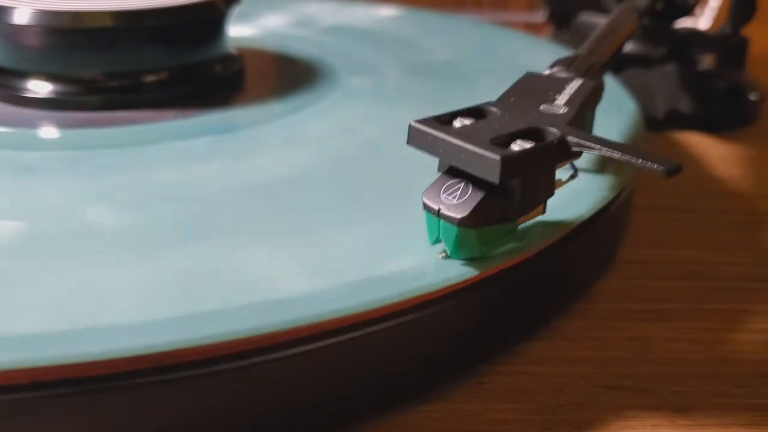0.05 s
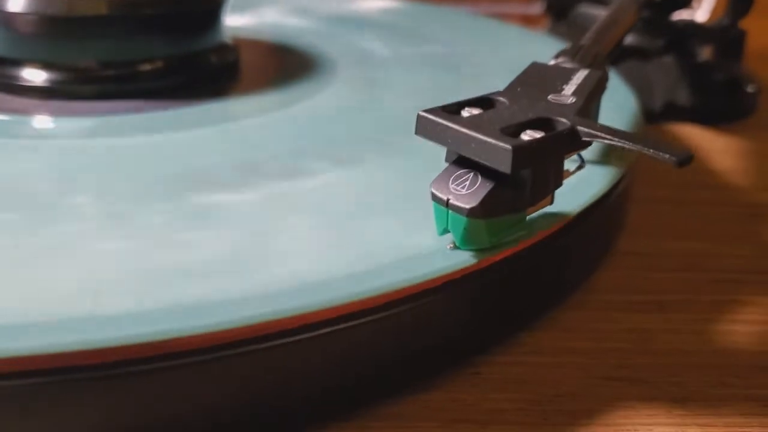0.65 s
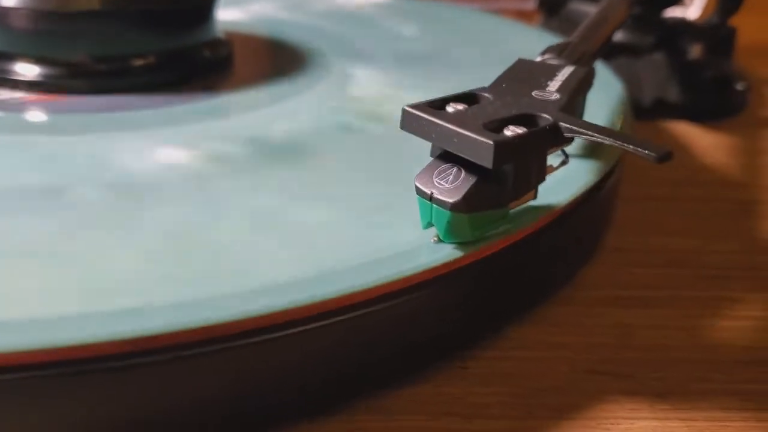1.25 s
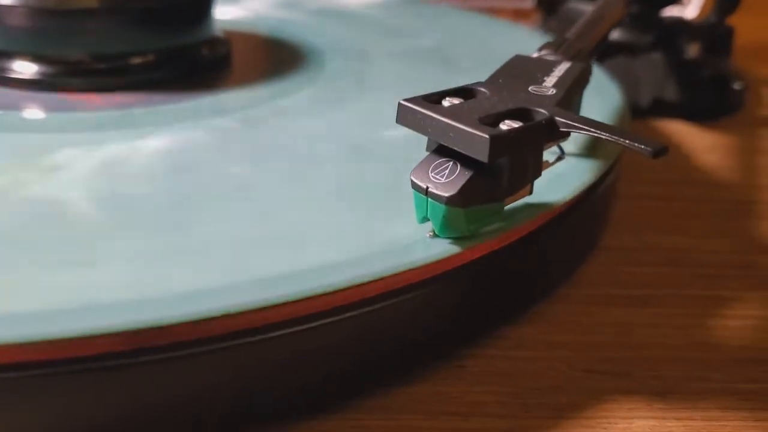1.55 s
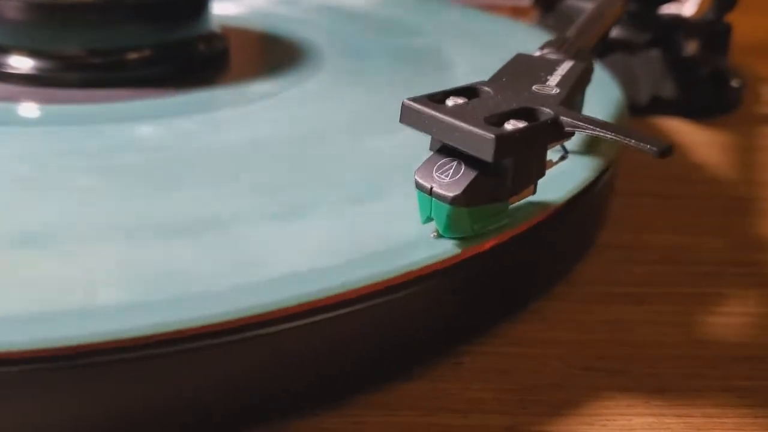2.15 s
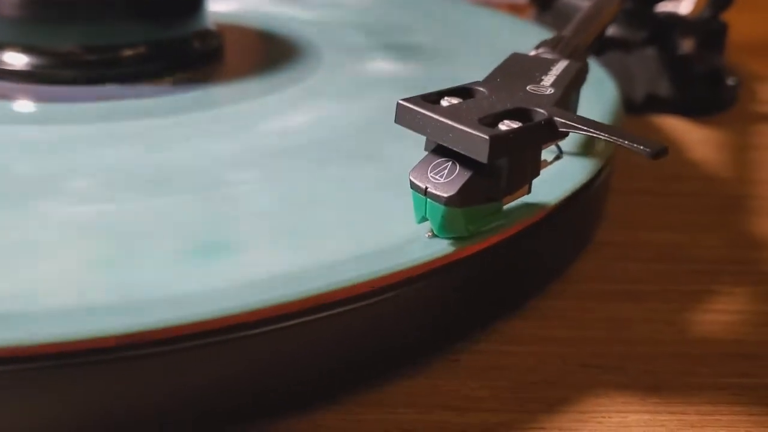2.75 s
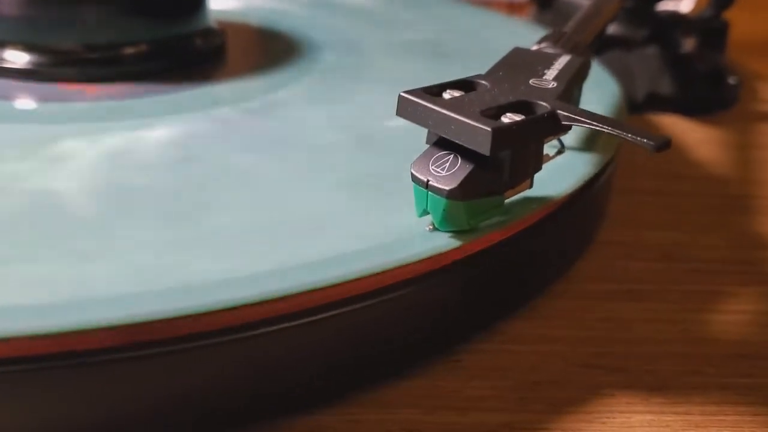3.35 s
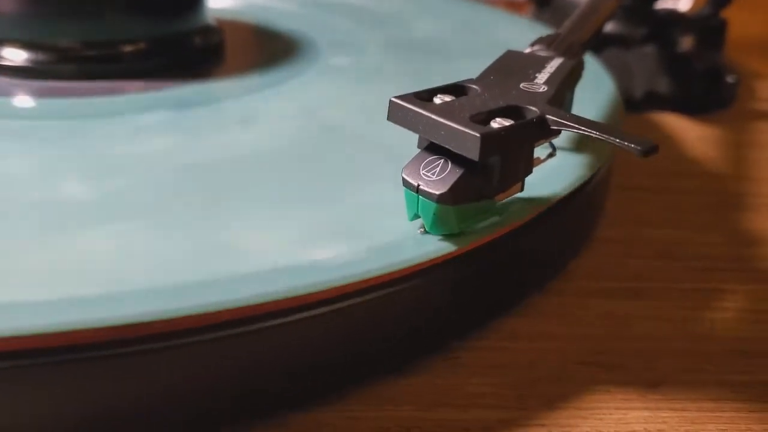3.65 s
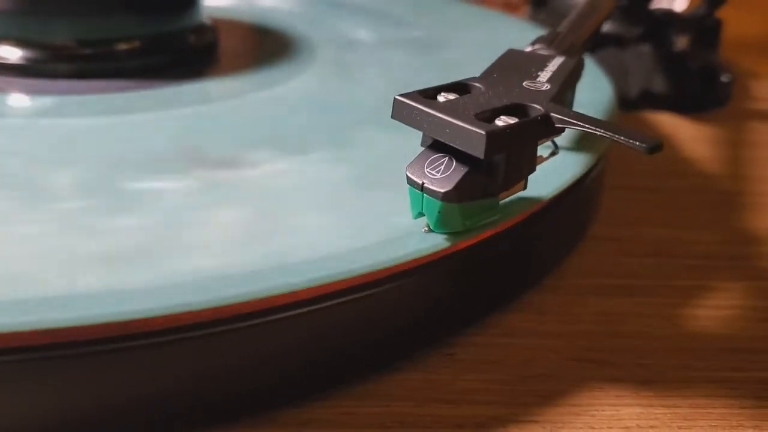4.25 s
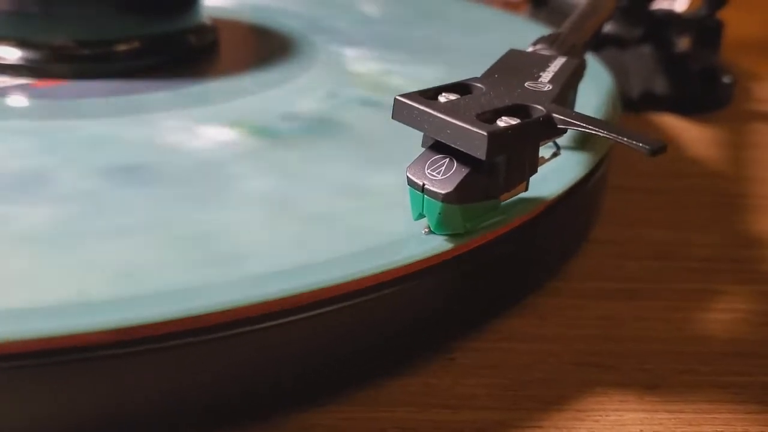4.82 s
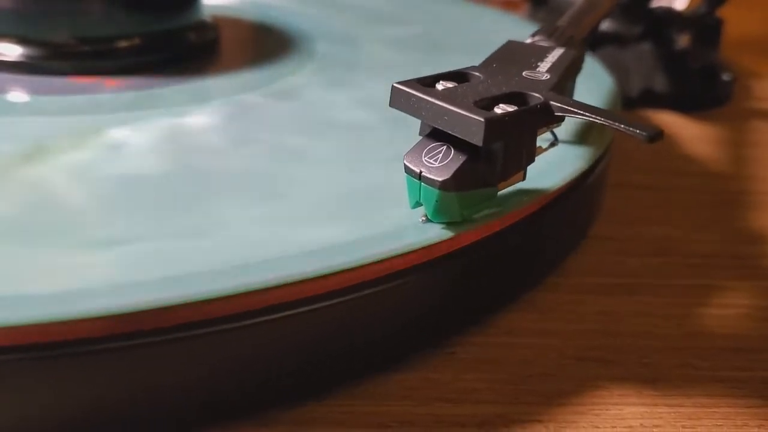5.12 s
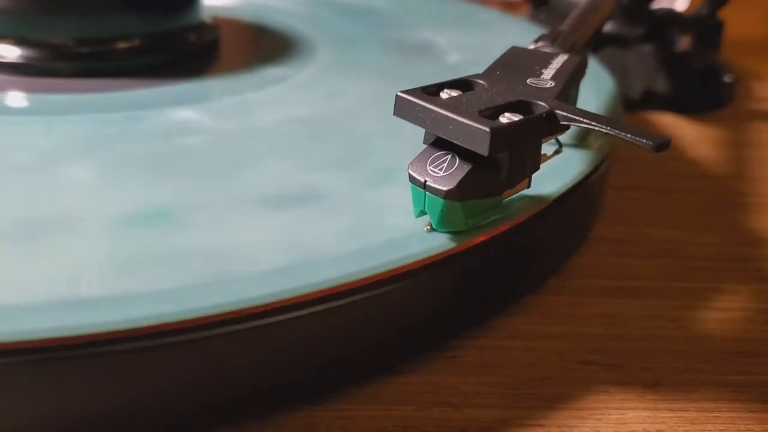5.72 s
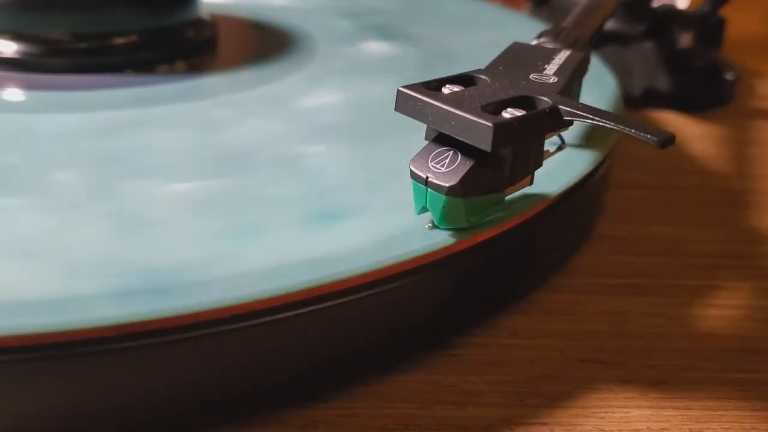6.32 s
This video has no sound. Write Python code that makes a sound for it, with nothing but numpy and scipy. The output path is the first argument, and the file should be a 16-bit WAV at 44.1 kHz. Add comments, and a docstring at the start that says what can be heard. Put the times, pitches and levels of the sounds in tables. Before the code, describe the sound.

A record stylus pops and thumps once per turn, with fine ticks between, over faint hiss, low rumble and motor hum.

```python
"""A small room, heard from a phone beside a record deck: a stylus rides the unmodulated edge groove at
33 rpm and plays through a loudspeaker. Once a turn a deep nick kicks it into a pop and a bass thump,
then a few fine scratches tick; warps bump softly in between. Under it all, grains of the groove wall
crackle and hiss, the bearing rumbles and the motor hums."""
import sys
import numpy as np
from scipy import signal
from scipy.fft import rfft, irfft, next_fast_len
from scipy.io import wavfile
from scipy.ndimage import uniform_filter1d

SR = 44100
rng = np.random.default_rng(int(sys.argv[2]) if len(sys.argv) > 2 else 0)


def transcribe(signal):
    """Save signal, clipped to [-1, 1], as a 16-bit WAV file at the path in sys.argv[1]."""
    frames = np.atleast_2d(signal).T
    limited = np.clip(frames, -1, 1)
    pcm = np.round(limited * 32767).astype(np.int16)
    wavfile.write(sys.argv[1], SR, pcm)


N = 290178
TURN_S = 1.8008
TIME = np.arange(N) / SR
FFT_SIZE = next_fast_len(N + SR)
FREQ = np.maximum(np.arange(FFT_SIZE // 2 + 1) * SR / FFT_SIZE, 1)

# The deep nick, once a turn. Each row: start in seconds, level in dB.
NICK_HITS = [(0.4310, -0.5), (2.2356, -0.4), (4.0171, -2), (5.8286, -0.5)]
# The pop's tone, dull because the nick is wide. Each row: frequency in Hz, gain in dB.
POP_EQ = [(100, 3), (230, 9.5), (380, 4.5), (620, 12), (800, -2), (1100, -1), (1700, -8.5), (2100, -12.5),
          (3100, -12.5), (5700, -18.5), (7300, -29.5), (9000, -37), (15000, -33)]
# Tonearm and record ringing after a kick. Each row: pitch in Hz, level in dB, t60 in seconds.
ARM_MODES = [(353.5, -39, 0.096), (415, -49, 0.053), (470, -49, 0.17), (580, -66, 0.043),
             (672, -58.5, 0.093), (986, -52.5, 0.21), (990, -51, .06), (1206, -82, 0.26),
             (1410, -67, 0.063), (1954, -55, 0.096), (2010, -63, .09), (2216, -69, .1), (2370, -65, 0.13)]
# The boom of loudspeaker and room.
# Each row: pitch in Hz, level in dB, t60 in seconds, polarity at the listener.
BASS_MODES = [(55.9, -28, 0.29, -1), (71.2, -16, 0.19, 1), (80.15, -23, 0.29, -1), (95.44, -11.5, 0.19, -1),
              (96.2, -20.5, 0.31, 1), (105.8, -24, 0.16, 1), (157, -26, 0.052, 1)]
# Fine scratches and dust. Each row: seconds into the turn, level in dB, treble tilt in dB per octave,
# left minus right groove wall in dB, low cut in Hz.
SCRATCHES = [(0.0471, -42, -7, 3, 7000), (0.5117, -21.5, -10.5, 0, 2200), (0.5303, -19.5, -2, -5.5, 1500),
             (0.5511, -35, -2, -3, 3000), (0.5965, -35.5, 9, -6.5, 7000), (1.4734, -37, -15, 4, 6000),
             (1.5139, -33.5, -1.5, -2, 7000)]
# Warps and dimples that lift the stylus.
# Each row: crest in seconds into the turn, peak in dB, length in seconds.
WARPS = [(0.222, -43.5, 0.12), (0.726, -46.5, 0.07), (1.202, -45.5, 0.098), (1.675, -49, 0.081)]
# Scuffed patches. Each row: seconds into the turn, level in dB, decay time in seconds, centre in Hz.
SCUFFS = [(0.073, -65.5, 0.017, 5800), (1.166, -69, 0.051, 5500), (1.474, -67.5, 0.066, 5970)]
# Short crackly scuffs that do not sound on every turn.
# Each row: start in seconds, level in dB, decay time in seconds, centre in Hz.
OCCASIONAL_SCUFFS = [(0.379, -58, 0.012, 5500), (2.529, -55, 0.031, 2820), (3.862, -66.5, 0.027, 5600),
                     (3.977, -65, 0.013, 5580), (5.761, -57.5, 0.0065, 4420), (5.781, -57, 0.009, 4400),
                     (5.804, -58.5, .007, 4400)]
# Direct sound from the loudspeaker into each microphone port. Each row: frequency in Hz, gain in dB.
LEFT_PORT_EQ = [(1100, 1), (1750, -0.5), (2050, 10.5), (3100, -2), (4300, -14), (5100, 5.5), (5750, 13.5),
                (6450, 8), (7200, -22), (8300, -24), (9500, 1.5), (11200, -0.5), (12800, -13.5),
                (15500, -22.5)]
RIGHT_PORT_EQ = [(600, 1), (1200, -10.5), (1700, -12), (2100, -9), (3100, -2), (5100, -8), (5900, -13.5),
                 (7800, -13), (9000, -6.5), (10800, -24), (12100, -1.5), (14000, -13.5), (16000, -10)]
# The colour of the room's reflections. Each row: frequency in Hz, left gain in dB, right gain in dB.
REVERB_EQ = [(120, -5.5, -17), (330, -6, -7), (638, -9.5, -12), (1090, -17, -12.5), (1574, -5, -15.5),
             (1940, -1.5, -10.5), (3030, -4.5, -13), (4360, -7, -14.5), (5530, -1.5, -7.5),
             (6710, 3.5, -23), (7500, -19.5, -11.5), (9220, 2, -11), (12000, -23, -5), (15500, -18, -21)]
# The bed of rumble and room air. Each row: frequency in Hz, left gain in dB, right gain in dB.
RUMBLE_EQ = [(24.5, -64, -56.5), (46.4, -42, -39.5), (60.6, -34, -32.5), (111.8, -36.5, -36),
             (154, -46.5, -44.5), (198, -39.5, -44), (265, -51.5, -52), (537, -52.5, -59),
             (553, -49.5, -57.5), (1377, -59, -63.5), (1515, -61.5, -72.5), (2810, -75, -77),
             (7600, -88.5, -96), (15200, -80.5, -88)]
# The motor's tones. Each row: pitch in Hz, level in dB, start of a one-second fade-in in seconds.
MOTOR_TONES = [(184, -64.5, -1), (323, -81, -1), (574, -82.5, -1.8), (824, -89, -1), (1318, -86, 1.5)]


def nick_kicks():
    """One sharp kick of the stylus each time the nick comes round."""
    kicks = np.zeros(N)
    for start, db in NICK_HITS:
        add(kicks, start, undb([db]))
    return kicks


def pop(kicks, low_cut_hz=70, scrape_db=-54, scrape_after_s=0.018, scrape_width_s=0.021):
    """The kick cracks, the arm rings, and the stylus scrapes as it settles back on the groove walls."""
    crack = eq_curve(POP_EQ) * 1j * FREQ / (1j * FREQ + low_cut_hz)
    settling = sum(undb(db) * np.exp(-((TIME - start - scrape_after_s) / scrape_width_s) ** 2)
                   for start, db in NICK_HITS)
    scrape_eq = eq_curve([(500, -10.5), (4200, 3), (5800, -22), (9000, -12.5)])
    scrape = filtered(settling * rng.standard_normal(N), scrape_eq)
    return filtered(kicks, crack + ringing(ARM_MODES)) + undb(scrape_db) * scrape


def thump(kicks):
    """The kick rings the bass modes, which beat as they die, a little right of centre."""
    return filtered(kicks, ringing(BASS_MODES)) * pan(left_db=-1.95)


def ticks(tilt_above_hz=5700, size=256):
    """Fine scratches: very short pulses without bass, unequal on the two groove walls."""
    out = np.zeros((2, N))
    hz = np.maximum(np.arange(size // 2 + 1) * SR / size, 1)
    octaves_up = np.log2(np.maximum(hz / tilt_above_hz, 1))
    for at, db, tilt_db, wall_db, low_cut_hz in every_turn(SCRATCHES):
        spectrum = undb(db + tilt_db * octaves_up) * hz / np.hypot(hz, low_cut_hz)
        pulse = np.roll(irfft(spectrum), size // 2)
        add(out, at - size / 2 / SR, pulse * pan(wall_db))
    return out


def warps(bass_hz=77, wander=0.1, bounce_after_s=0.143, bounce_db=-43.5, bounce_length_s=0.046):
    """Warps and the arm's bounce after a pop rock the stylus; only the speaker's bass resonance sounds."""
    swell = np.zeros(N)
    bounces = [(start + bounce_after_s, db + bounce_db, bounce_length_s) for start, db in NICK_HITS]
    for crest, db, length in every_turn(WARPS) + bounces:
        add(swell, crest - length / 2, undb(db) * np.hanning(int(length * SR)))
    return swell * sine(bass_hz * (1 + wander * drift(60)))


def scuffs():
    """Coarser grains on a scuffed patch crackle: fast attack, then thinning out."""
    out = np.zeros(N)
    age = TIME[:SR // 4]
    patches = every_turn(SCUFFS) + list(OCCASIONAL_SCUFFS)
    crackle = np.resize(grains(spread_db=6), (len(patches), len(age)))
    for (start, db, decay_s, hz), grit in zip(patches, crackle):
        envelope = np.exp(-age / decay_s) * (1 - np.exp(-20 * age / decay_s))
        band = signal.butter(1, [hz / 2, min(2 * hz, .45 * SR)], "bandpass", fs=SR)
        add(out, start, undb(db) * signal.lfilter(*band, envelope * grit))
    return out


def hiss(db=-73, waver_db=0.8, low_cut_hz=4000, wear_db=0.43, worn_at_s=0.36):
    """Tiny grains of the groove wall give only treble, swelling on the worn side around the nick."""
    swell_db = wear_db * np.cos(2 * np.pi * (TIME - worn_at_s) / TURN_S)
    level = undb(db + swell_db + waver_db * drift(10))
    return filtered(level * grains(spread_db=4), FREQ / np.hypot(FREQ, low_cut_hz))


def loudspeaker(groove, reverb_db=-1.5, left_lag_s=0.00048):
    """The groove's sound reaches the right port first, then the left, then both by way of the room."""
    out = []
    for channel, (port_eq, lag_s) in enumerate([(LEFT_PORT_EQ, left_lag_s), (RIGHT_PORT_EQ, 0)]):
        reverb = undb(reverb_db) * rfft(room_echoes(), FFT_SIZE) * eq_curve(REVERB_EQ, channel)
        delay = np.exp(-2j * np.pi * FREQ * lag_s)
        out.append(filtered(groove[channel], (eq_curve(port_eq) + reverb) * delay))
    return np.array(out)


def room_echoes(mid_t60=0.33, treble_t60=0.16, split_hz=5000,
                early_t60=0.053, early_db=-5, predelay_s=0.00084):
    """Near surfaces scatter briefly; the walls ring on, and swallow the treble first."""
    t = TIME[:SR // 2]
    late, early = rng.standard_normal((2, len(t)))
    mids = signal.sosfiltfilt(signal.butter(2, split_hz, fs=SR, output="sos"), late)
    tail = mids * fade(t, mid_t60) + (late - mids) * fade(t, treble_t60)
    early = early * fade(t, early_t60)
    echoes = tail / np.linalg.norm(tail) + undb(early_db) * early / np.linalg.norm(early)
    return echoes * (t > predelay_s)


def rumble(mono_below_hz=650, swell_db=1):
    """Bearing rumble and room air: shared by both ports in the bass, wide in the treble."""
    mono_share = 1 / (1 + (FREQ / mono_below_hz) ** 2)
    centre = filtered(rng.standard_normal(N) * undb(swell_db * drift(7.9)), np.sqrt(mono_share))
    sides = filtered(rng.standard_normal((2, N)), np.sqrt(1 - mono_share))
    return np.array([filtered(centre + sides[side], eq_curve(RUMBLE_EQ, side)) for side in (0, 1)])


def motor_hum(waver_db=0.52, drift_hz=1.239):
    """Slightly wavering tones of the motor; the thin top one fades in later."""
    out = np.zeros(N)
    for hz, db, start in MOTOR_TONES:
        fade_in = np.clip(TIME - start, 0, 1)
        level = np.sqrt(2) * undb(db - waver_db * drift(6.5))
        out += fade_in * level * sine(hz + drift_hz * drift(10))
    return out


def ringing(modes, attack_s=0.00032):
    """Frequency response of decaying modes; the cartridge reads velocity, hence cosines."""
    t = TIME[:SR]
    ring = sum(np.prod(np.sign(polarity)) * undb(db) * fade(t, t60) * np.cos(2 * np.pi * hz * t)
               for hz, db, t60, *polarity in modes)
    attack = 1 - np.exp(-(t / attack_s) ** 2)
    return rfft(ring * attack, FFT_SIZE)


def grains(spread_db):
    """Crackly noise of unit level whose grains differ in size by spread_db."""
    grit = rng.standard_normal(N) * undb(spread_db * rng.standard_normal(N))
    return grit / grit.std()


def every_turn(marks):
    """Loop rows that begin with seconds into the turn, each time the record comes round."""
    return [(turn + at, *rest) for turn in np.arange(0, N / SR, TURN_S)
            for at, *rest in marks if turn + at < N / SR]


def eq_curve(points, channel=0):
    """Minimum-phase EQ through points in Hz and dB, made by folding the cepstrum."""
    table = np.array(points, float)
    gain_db = np.interp(np.log(FREQ), np.log(table[:, 0]), table[:, 1 + channel])
    cepstrum = irfft(np.log(undb(gain_db)), FFT_SIZE)
    cepstrum[1:FFT_SIZE // 2] *= 2
    cepstrum[FFT_SIZE // 2 + 1:] = 0
    return np.exp(rfft(cepstrum))


def filtered(sound, response):
    """Pass a sound through a frequency response."""
    return irfft(rfft(sound, FFT_SIZE) * response, FFT_SIZE)[..., :N]


def drift(rate_hz):
    """Smooth random wander with a spread of 1."""
    hold = int(SR / rate_hz)
    steps = np.repeat(rng.standard_normal(N // hold + 1), hold)
    smooth = uniform_filter1d(uniform_filter1d(steps, hold), hold)[:N]
    return smooth / smooth.std()


def sine(hz):
    """A sine that follows a moving pitch."""
    return np.sin(2 * np.pi * np.cumsum(hz) / SR)


def fade(t, t60):
    """Exponential decay, 60 dB down after t60 seconds."""
    return np.exp(-np.log(1000) * t / t60)


def pan(left_db):
    """Stereo gains with the left left_db above the right."""
    return undb(np.array([[left_db], [-left_db]]) / 2)


def undb(db):
    """Decibels to gain."""
    return 10 ** (np.asarray(db) / 20)


def add(track, start_s, sound):
    """Mix a sound into the track at start_s."""
    start = max(int(round(start_s * SR)), 0)
    part = track[..., start:start + sound.shape[-1]]
    part += sound[..., :part.shape[-1]]


def scene():
    """Everything the stylus picks up, played into the room over rumble and hum."""
    kicks = nick_kicks()
    groove = pop(kicks) + ticks() + hiss() + scuffs()
    return loudspeaker(groove) + thump(kicks) + warps() + rumble() + motor_hum()


def record(dry):
    """The phone cuts the top end steeply at 15650 Hz."""
    return signal.sosfilt(signal.ellip(8, .2, 70, 15650, fs=SR, output="sos"), dry)


dry = scene()
out = record(dry)
transcribe(out)
```